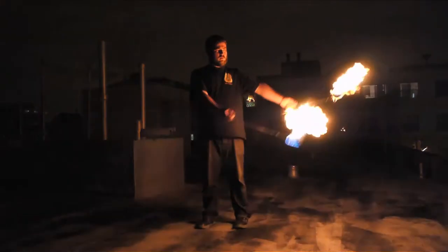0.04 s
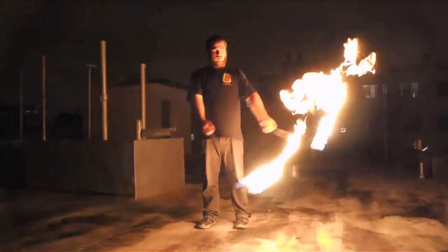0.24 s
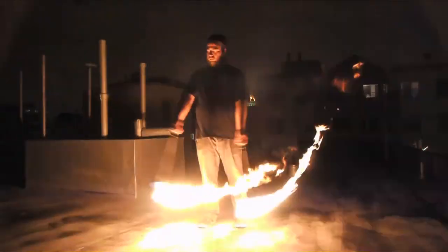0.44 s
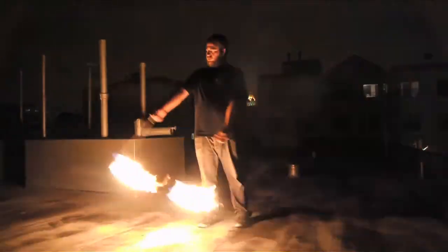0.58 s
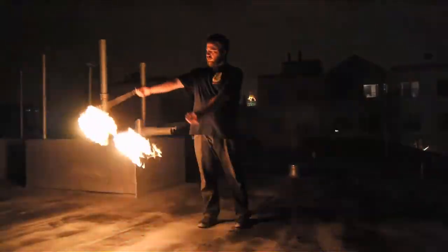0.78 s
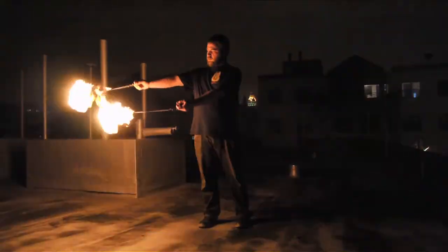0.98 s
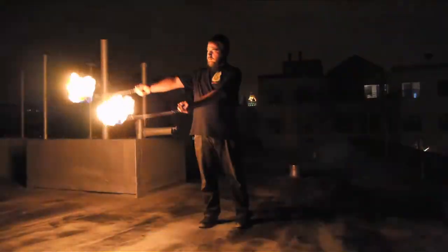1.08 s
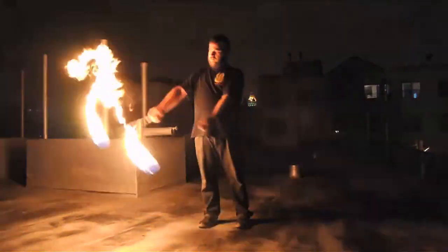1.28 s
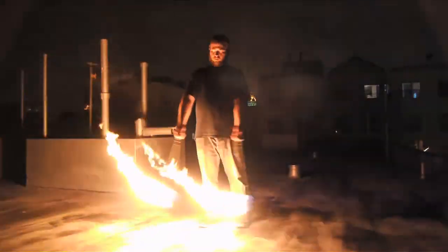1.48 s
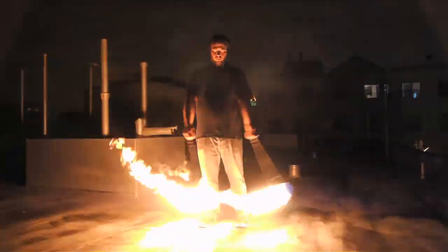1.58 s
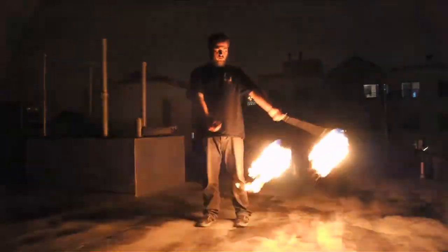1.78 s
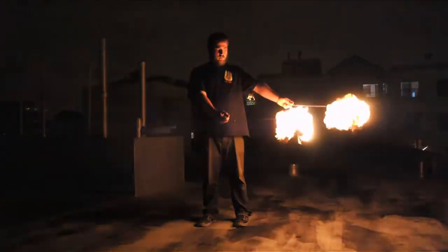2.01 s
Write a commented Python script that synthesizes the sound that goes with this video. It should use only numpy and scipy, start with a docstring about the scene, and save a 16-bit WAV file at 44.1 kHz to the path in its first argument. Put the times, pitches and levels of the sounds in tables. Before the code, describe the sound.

Swung flames swell into a deep, fluttering whoosh, fade, then roar back with a sharp flap of air. The fire moves from side to side before the microphone, on a rooftop with distant city rumble and a faint fan hum.

```python
"""Two burning poi (wicks on chains) swing down past the floor and up, twice, on a rooftop at night.
Each pass is a low, fluttering roar with a rush and hiss of air torn by the wicks. An echo off the
floor changes the tone as the flames dip and rise, and they flare briefly where the swing turns.
Nearby walls add a short echo. Behind it all are the rumble of the city and the hum of a far fan."""
import sys
import numpy as np
from scipy import signal
from scipy.fft import rfft, irfft
from scipy.io import wavfile
from scipy.ndimage import uniform_filter1d, minimum_filter1d, map_coordinates

SR = 44100
rng = np.random.default_rng(int(sys.argv[2]) if len(sys.argv) > 2 else 0)


def output_pcm(signal):
    """Save a mono or channel-first signal as 16-bit PCM at the path in sys.argv[1].

    Samples are clipped to [-1, 1] before scaling.
    """
    pcm = np.clip(np.atleast_2d(signal).T, -1, 1) * 32767
    wavfile.write(sys.argv[1], SR, np.round(pcm).astype(np.int16))


N = 90404
T = np.arange(N) / SR  # time of each sample
FREQS_HZ = np.fft.rfftfreq(N, 1 / SR)


def amp(db):
    """Turns decibels into a number to multiply by."""
    return 10 ** (np.asarray(db) / 20)


def unit(x):
    """Scales a signal to an average size (rms) of 1."""
    return x / np.sqrt(np.mean(x ** 2) + 1e-20)


def at_pitch(table, hz):
    """Looks up a table of (pitch_hz, value) rows, sliding between them on a log scale."""
    pitch_hz, value = np.transpose(table)
    return np.interp(np.log(hz + 1), np.log(pitch_hz + 1), value)


def curves(table):
    """Turns each column after time_s into one value per sample."""
    time_s, *columns = np.transpose(table)
    return [np.interp(T, time_s, column) for column in columns]


def arch(start_s, length_s):
    """One smooth rise and fall: half a sine wave."""
    return np.sin(np.pi * np.clip((T - start_s) / length_s, 0, 1))


def colour(x, tone):
    """Makes each pitch louder or softer, following (pitch_hz, gain_db) rows."""
    return irfft(rfft(x) * amp(at_pitch(tone, FREQS_HZ)), N)


def noise(tone):
    """Noise of size 1 with the given tone."""
    return unit(colour(rng.standard_normal(N), tone))


def wander(rate_hz):
    """A random wobble of size 1, at roughly this rate."""
    f = FREQS_HZ / rate_hz
    return unit(irfft(rfft(rng.standard_normal(N)) * f / (1 + f ** 4), N))


def delayed(x, lag_ms):
    """A later copy of the sound; the lag may be steady or moving."""
    return map_coordinates(x, [np.arange(N) - lag_ms * SR / 1000], order=3, mode="mirror")


def eddies(tone, smooth_s, evenness):
    """Swirling air fed at a steady rate: noise with its swells evened out (0 not at all, 1 most)."""
    width = SR // 5
    window = np.exp(-.5 * (np.linspace(-.1, .1, width) / smooth_s) ** 2)
    swirl = noise(tone)
    power = np.pad(swirl ** 2, width, "reflect")
    slow_power = signal.fftconvolve(power, window / window.sum(), "same")[width:][:N]
    return unit(swirl / (abs(slow_power) + 1e-9) ** (evenness / 2))


def city():
    """A steady far rumble: the ears hear much the same lows but different highs."""
    # tone of the rumble: pitch_hz, gain_db
    tone = [(15, -40), (30, -24), (60, 3), (150, -5), (300, 3.5), (410, 2.5), (480, -11), (570, -4.5),
            (700, -8.5), (1000, -12.5), (2000, -25), (3000, -30.5), (5000, -35), (9000, -41), (15000, -44)]
    # how alike the ears are: pitch_hz, likeness (1 the same, 0 unrelated)
    ear_likeness = [(60, 0.74), (550, .92), (1650, 0.63), (3500, 0), (5000, 0), (15000, -.1)]
    same = at_pitch(ear_likeness, FREQS_HZ)
    left, other = noise(tone), noise(tone)
    right = irfft(same * rfft(left) + np.sqrt(1 - same ** 2) * rfft(other), N)
    return amp(-38) * np.array([left, right])


def fan():
    """A far fan hums two slightly wavering notes."""
    # notes of the hum: pitch_hz, level_db
    notes = [(548.4, -40.5), (388.4, -48.5)]
    hum = np.zeros(N)
    for pitch_hz, level_db in notes:
        wavering_hz = pitch_hz + .5 * wander(rate_hz=2.2)
        hum += amp(level_db) * np.sqrt(2) * np.sin(2 * np.pi * np.cumsum(wavering_hz) / SR)
    return hum


def wall_echo(x):
    """Walls and nearby houses scatter the sound into a short tail, different at each ear."""
    # time the tail takes to fade by 60 dB: pitch_hz, fade_s
    fade_times = [(100, 0.77), (1000, 0.25), (4000, 0.55), (14000, 0.24)]
    # strength of the tail: pitch_hz, gain_db
    tone = [(100, -16), (500, -12), (1100, -6.5), (2000, -9), (6000, -8.5), (14000, 0)]
    hz, time_s, bands = signal.stft(rng.standard_normal((2, SR // 2)), SR, nperseg=256)
    fade = amp(-60 * time_s / at_pitch(fade_times, hz)[:, None])
    _, tail = signal.istft(bands * fade, SR, nperseg=256)
    tail /= np.linalg.norm(tail[0])
    echo = signal.fftconvolve(x.mean(0)[None], tail, axes=1)[:, :N]
    return colour(echo, tone)


def flares():
    """A soft puff where the swing turns, as the flame catches up with the stalled wick."""
    # the puffs: start_s, length_s, level_db, left_minus_right_db
    puffs = [(0.038, 0.076, -42, -3), (1.093, 0.068, -37.5, 3)]
    # tone of a puff: pitch_hz, gain_db
    tone = [(200, -16), (450, 4), (660, 5), (1000, -12.5), (2000, -17), (4000, -25), (6000, -34.5),
            (11000, -37), (15500, -48)]
    return sum(amp([[db + pan_db / 2], [db - pan_db / 2]]) * arch(start_s, length_s) * noise(tone)
               for start_s, length_s, db, pan_db in puffs)


def sizzle():
    """A thin sizzle as a wick dives."""
    # the sizzles: start_s, length_s, level_db
    dives = [(.24, 0.18, -62.5), (1.42, .4, -70)]
    # tone of the sizzle: pitch_hz, gain_db
    tone = [(2000, -34), (7000, 6), (13000, -2), (15000, -4), (16000, -12)]
    return noise(tone) * sum(amp(db) * arch(start_s, length_s) for start_s, length_s, db in dives)


def flaps():
    """The sheet of flame flaps: one push of air, with a recoil just before and after."""
    # the flaps: middle_s, push_db (before the recoil is taken off)
    pushes = [(.644, -25), (1.659, -3), (1.699, -20)]
    width_s, recoil = 0.0016, 0.82
    pressure = np.zeros(N)
    for middle_s, push_db in pushes:
        offset = (T - middle_s) / width_s
        pressure += amp(push_db) * (np.exp(-offset ** 2) - recoil * np.exp(-(offset * recoil) ** 2))
    return pressure


def buffeting():
    """Swirling air makes a deep rumble under the roar."""
    # loudness of the rumble: time_s, level_db
    levels = [(0, -42), (.15, -45), (.21, -25), (.255, -26.5), (.28, -40), (.33, -27.5), (.44, -25),
              (.475, -20), (.5, -17.5), (.545, -13.5), (.6, -23), (.66, -28.5), (.72, -35), (.79, -38),
              (.85, -28.5), (.94, -40.5), (1.22, -41), (1.3, -34), (1.37, -34), (1.42, -27), (1.47, -32.5),
              (1.51, -32), (1.58, -34), (1.65, -29), (1.73, -26.5), (1.8, -43), (1.92, -45), (2.05, -57)]
    # its tone: pitch_hz, gain_db
    tone = [(15, -41), (28, -27), (42, -5.5), (60, -6), (85, 1), (115, -2.5), (160, -7.5), (400, -14),
            (4000, -100)]
    level_db, = curves(levels)
    return eddies(tone, smooth_s=0.06, evenness=0.97) * amp(level_db)


def torn_air(flutter, sputter):
    """The wicks tear through the air, making a rush and a higher hiss."""
    # rise and fall of both sounds: time_s, rush_db, hiss_db
    levels = [(0, -57, -90), (.08, -41.5, -74), (.17, -41, -65), (.25, -32.5, -48.5), (.33, -36, -42),
              (.42, -27, -39), (.52, -24, -41), (.58, -26, -45.5), (.63, -36.5, -45), (.72, -43, -50.5),
              (.87, -48, -60), (1.03, -65, -83), (1.22, -53, -68), (1.35, -39, -54.5), (1.5, -39.5, -47),
              (1.58, -41.5, -45.5), (1.66, -29, -46), (1.74, -35.5, -50.5), (1.78, -45.5, -52),
              (1.82, -50, -52.5), (1.94, -64, -63.5), (2.05, -66, -72)]
    # tone of the rush: pitch_hz, gain_db
    rush_tone = [(250, -11), (500, -4), (750, 4.5), (1000, -1.5), (1400, -6), (2000, -13.5), (2800, -22.5),
                 (5000, -34.5), (15000, -70)]
    # tone of the hiss: pitch_hz, gain_db
    hiss_tone = [(900, -25), (2000, 8.5), (2800, 1.5), (4200, -2.5), (5200, -8), (7200, -11.5), (8800, -14),
                 (10500, -13), (12100, -24.5), (13400, -13), (14400, -26), (15700, -32)]
    rush_db, hiss_db = curves(levels)
    rush = eddies(rush_tone, smooth_s=0.0088, evenness=0.51) * amp(rush_db - 1.5 + flutter + 1.7 * sputter)
    hiss = noise(hiss_tone) * amp(hiss_db - 2.0 + 0.4 * flutter + 1.5 * sputter)
    return rush + hiss


def roar(flutter):
    """The swirling flames give a low roar that swells on each pass."""
    # rise and fall of the roar: time_s, level_db
    levels = [(0.0, -36.5), (0.19, -28), (0.33, -16.5), (0.35, -14), (0.37, -21), (0.4, -14), (0.47, -16.5),
              (0.5, -11), (0.84, -30), (1.01, -36.5), (1.23, -38.5), (1.36, -28.5), (1.43, -20.5),
              (1.46, -24.5), (1.49, -18.5), (1.68, -17.5), (1.7, -15.5), (1.73, -17.5), (1.74, -17),
              (1.79, -20.5), (1.82, -27), (2.05, -45)]
    # its tone: pitch_hz, gain_db
    tone = [(40, -42), (90, -31.5), (130, -4), (175, 2), (250, -0.5), (340, -6), (480, -8), (650, -15),
            (1000, -25), (2000, -40), (5000, -63), (15000, -100)]
    level_db, = curves(levels)
    return eddies(tone, smooth_s=0.022, evenness=0.69) * amp(level_db - 1.56 + flutter)


def swinging_flames():
    """The flames move from side to side; their floor echo cancels some pitches and boosts others."""
    # path of the swing: time_s, floor_lag_ms, left_minus_right_db
    path = [(0, 0.96, -7.5), (.2, 2.1, -8.5), (.33, 0.54, -7), (.42, .42, -6), (.55, 0.55, 1.5),
            (.65, 0.77, 5), (.78, 1.15, 5), (1.12, 1.72, 0), (1.32, 0.98, 2.5), (1.5, 0.39, 5),
            (1.56, 0.33, 4), (1.65, 0.52, 2.5), (1.75, .85, -6), (1.88, 1.22, -7), (2.05, 0.89, -4)]
    # echo off a surface close to the microphones: left_strength, right_strength
    near_echo = [0.27, 0.24]
    floor_lag_ms, pan_db = curves(path)
    flutter, sputter = wander(rate_hz=73), wander(rate_hz=290)  # quick wobbles in loudness
    low = roar(flutter) + buffeting() + flaps()
    high = torn_air(flutter, sputter) + sizzle()
    low = low + 0.21 * delayed(low, floor_lag_ms)
    high = high + 0.28 * delayed(high, floor_lag_ms)
    strength = np.array(near_echo)[:, None]
    high = (high + strength * delayed(high, lag_ms=0.2744)) / np.hypot(1, strength)
    sides_db = np.array([pan_db, -pan_db]) / 2
    return low * amp(0.27 * sides_db) + high * amp(sides_db)  # the lows move less than the highs


def scene():
    """The fire and its echo, with the city and the fan behind."""
    fire = swinging_flames() + flares()
    return fire + wall_echo(fire) + city() + fan()


def record(dry):
    """Smoothly turns down any peak that is too loud, then cuts highs beyond the microphone's range."""
    ceiling, top_hz = .8, 15720
    gain = ceiling / np.maximum(abs(dry).max(0), ceiling)
    held_gain = minimum_filter1d(gain, size=441)
    smooth_gain = uniform_filter1d(uniform_filter1d(held_gain, size=221), size=221)
    high_cut = signal.firwin(511, top_hz, window=("kaiser", 9), fs=SR)
    return signal.oaconvolve(dry * smooth_gain, high_cut[None], "same")


dry = scene()
out = record(dry)
output_pcm(out)
```